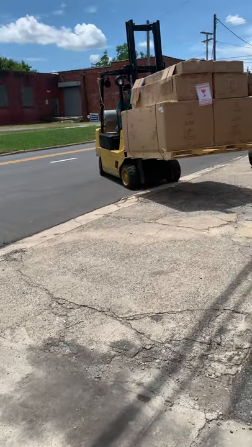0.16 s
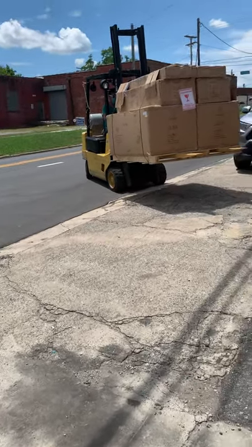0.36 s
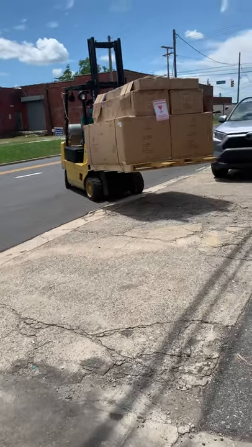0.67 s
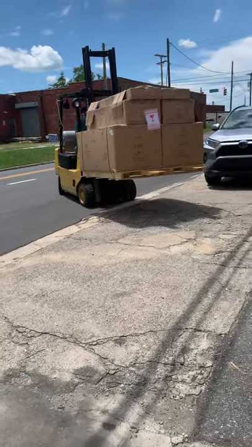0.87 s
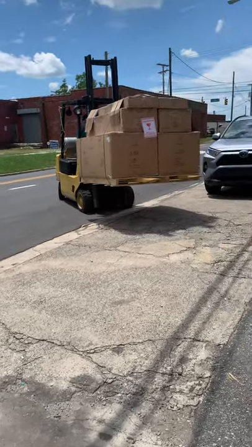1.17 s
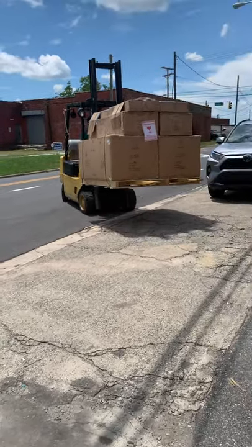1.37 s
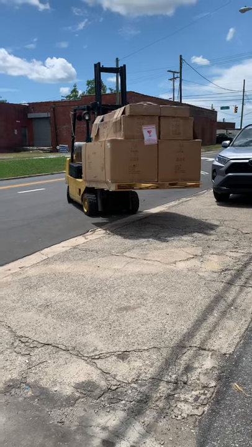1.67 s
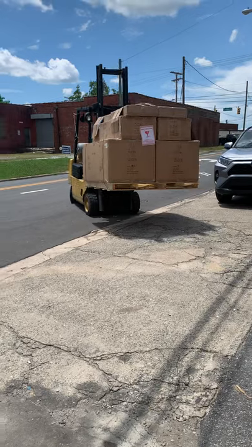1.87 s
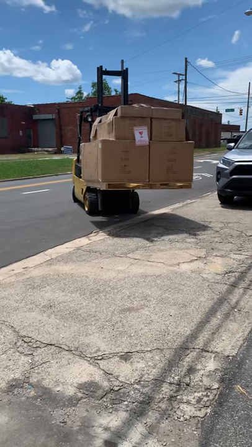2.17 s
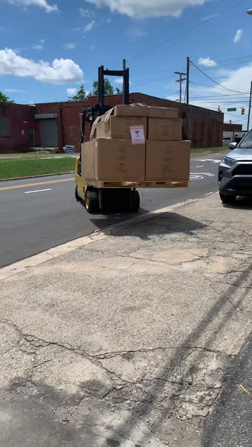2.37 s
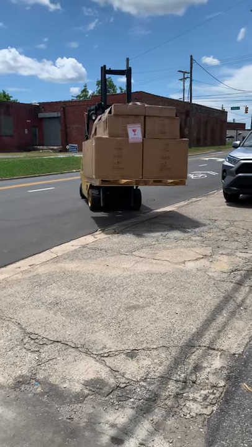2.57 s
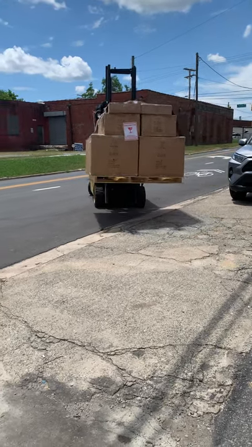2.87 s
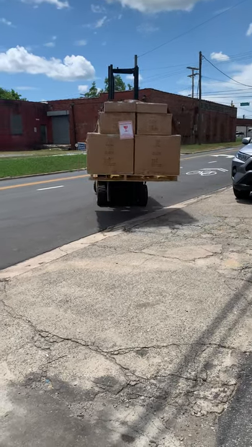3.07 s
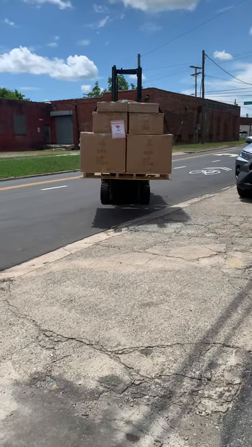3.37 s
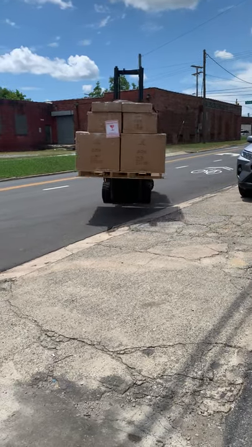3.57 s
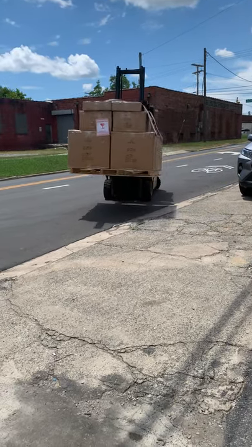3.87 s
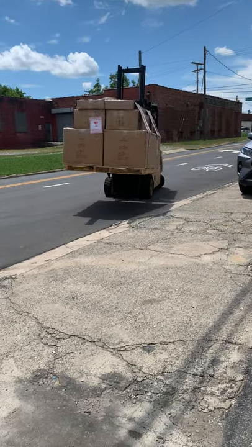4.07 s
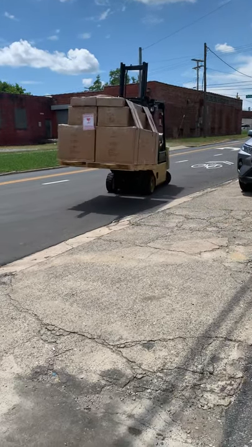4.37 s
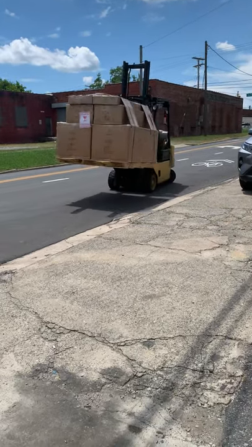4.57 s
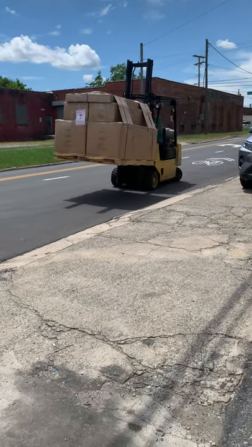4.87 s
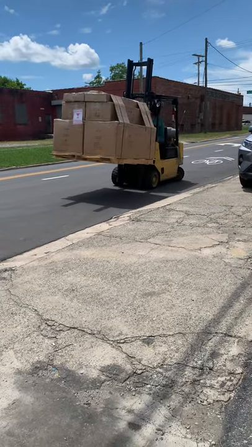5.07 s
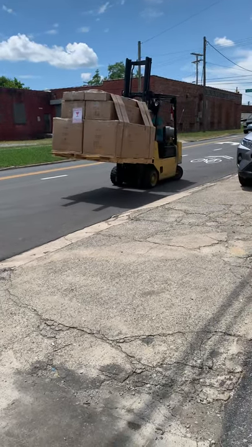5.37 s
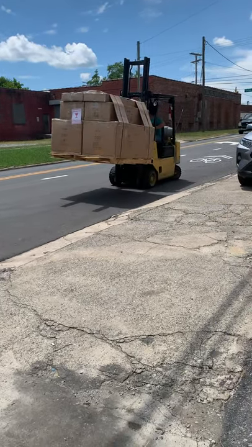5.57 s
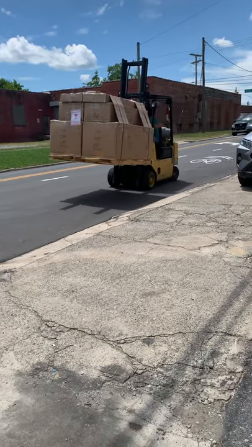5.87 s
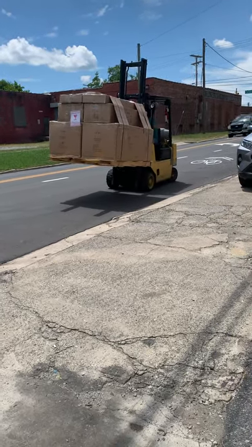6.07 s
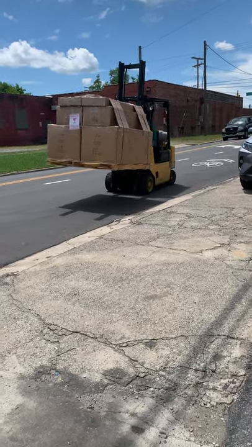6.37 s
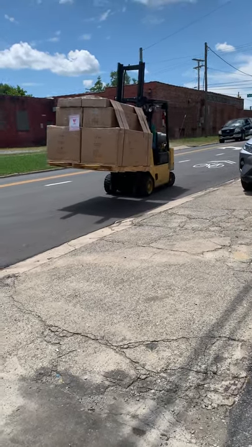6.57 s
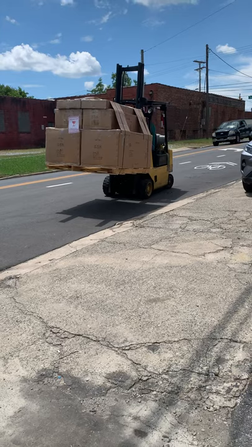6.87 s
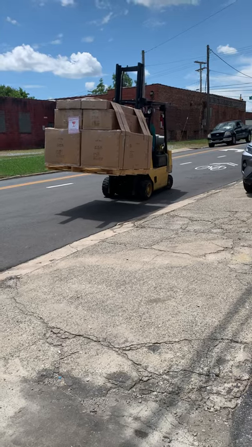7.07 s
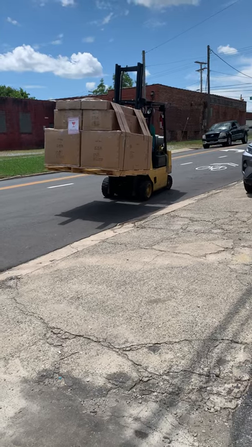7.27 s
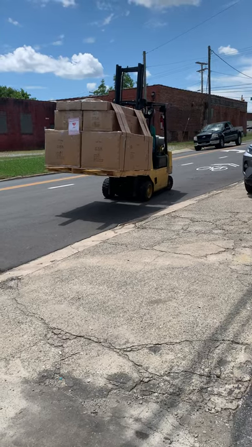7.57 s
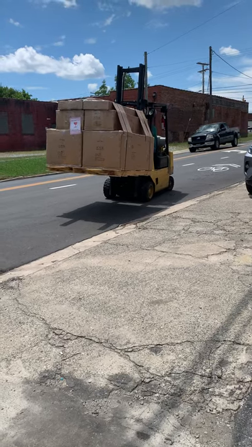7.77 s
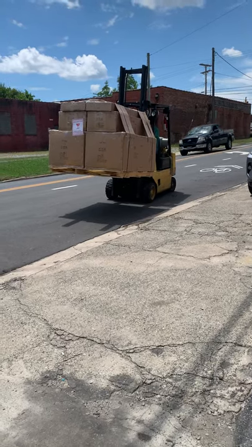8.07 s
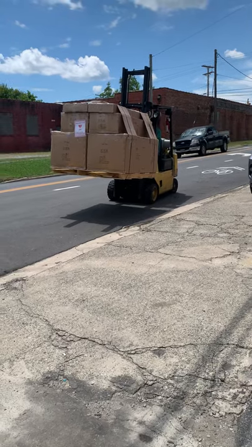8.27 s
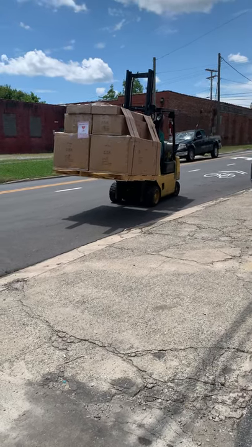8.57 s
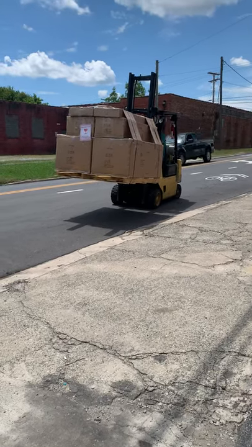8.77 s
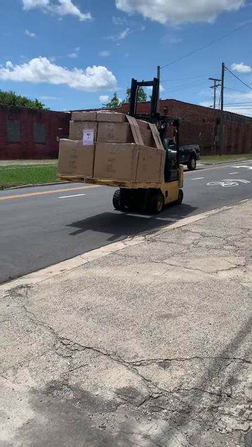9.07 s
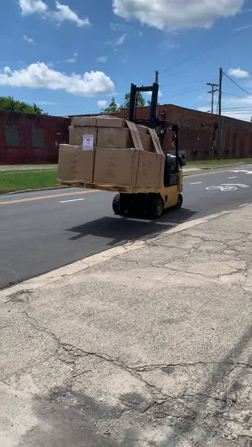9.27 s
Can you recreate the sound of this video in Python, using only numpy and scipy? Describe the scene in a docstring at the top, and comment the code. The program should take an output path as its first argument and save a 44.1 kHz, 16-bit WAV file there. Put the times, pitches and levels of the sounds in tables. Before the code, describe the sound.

Outdoors near a brick-lined road, a steady, limping engine throb rises in two surges as a loaded forklift turns, with whines, valve clatter and a thin squeak. It drops back to idle over gritty tyres. Mast and load then rattle in scattered hollow knocks, and a pickup's tyre roar and drone come and go. Handheld stereo pickup at a few metres, faint town rumble.

```python
"""Forklift with a pallet of boxes on a street

A four-cylinder forklift idles, revs up to turn and settles: harmonics of the firing rate slide through
pipe resonances, while filtered noise, mostly tied to the crankshaft, makes gas rumble, block, valves, hiss.
Decaying modes make the knocks of mast and load and the chinks of the lift chain; noise bands make scrubs,
squeaks and grit; swept tones make whines. Echoes, town rumble and a passing pickup surround it."""
import sys
import numpy as np
from scipy import signal
from scipy.fft import rfft, irfft
from scipy.io import wavfile
from scipy.ndimage import uniform_filter1d

SR = 44100
rng = np.random.default_rng(int(sys.argv[2]) if len(sys.argv) > 2 else 0)


def digitize_waveform(pressure):
    """Quantize a signal to 16-bit integers and store it at the path in sys.argv[1].

    Rows of a 2-D input are taken as channels; values are limited to [-1, 1].
    """
    field = np.atleast_2d(pressure).T
    bounded = np.clip(field, -1, 1)
    quanta = np.round(bounded * 32767).astype(np.int16)
    wavfile.write(sys.argv[1], SR, quanta)


N = 414981
TIME = np.arange(N) / SR
FREQS = np.arange(N // 2 + 1) * SR / N


def undb(db):
    """Logarithmic level: decibels to amplitude gain."""
    return 10 ** (np.asarray(db) / 20)


def level(x, db):
    """Root-mean-square level: normalise x, then apply a level or level curve [dB]."""
    return x * undb(db) / np.sqrt(np.mean(x ** 2))


def curves(table):
    """Linear interpolation: each column of a table of timed rows becomes a curve."""
    s, *columns = np.transpose(table)
    return [np.interp(TIME, s, c) for c in columns]


def response(points):
    """Frequency response: gain at every frequency, joined on a log scale from (frequency [Hz], level [dB])."""
    hz, db = np.transpose(points)
    return undb(np.interp(np.log(FREQS + 1), np.log(hz), db))


def colour(x, points):
    """Linear filtering: multiply the spectrum of x by a response."""
    return irfft(rfft(x) * response(points), N)


def noise():
    """White noise: equal mean power at every frequency."""
    return rng.standard_normal(N)


def walk(hz):
    """Low-passed noise: a smooth random wander up to about hz, with rms spread 1."""
    return level(irfft(rfft(noise()) * np.exp(-(FREQS / hz) ** 2), N), 0)


def decay(t, t60):
    """Exponential damping: 60 dB down after t60 [s]."""
    return np.exp(-np.log(1000) * t / t60)


def swell(s, length):
    """Gaussian envelope: a bell-shaped rise and fall around time s."""
    return np.exp(-2 * ((TIME - s) / length) ** 2)


def add(out, s, x):
    """Superposition: mix x into out from time s."""
    i = int(np.clip(s * SR, 0, N - 1))
    out[i:i + len(x)] += x[:N - i]


# firing rates [1/s] over which the cylinders even out, the pulses take their revved shape,
# and (from full sag to none) the sagging engine recovers
EVEN_HZ, REVVED_HZ, SAG_HZ = (28.64, 33.1), (32, 34.5), (24.2, 26.2)

# resonances of the exhaust pipe and body:
# (centre [Hz], half width [Hz], relative level [dB], extra from the right side [dB])
PIPE_MODES = [(37.8, 2.9, -35, -0.5), (53.1, 4.7, -32.5, -1), (83, 26, -42.5, 4.5), (109.5, 4.6, -40, 13.5),
              (123.2, 9.35, -25.5, -1.5), (163, 15, -32, 1.36), (189, 6.9, -36.5, 5),
              (247.7, 15.9, -41.5, 6.5), (284.6, 12, -55, 15.5), (352, 32, -42, -1.5)]


def pipe(hz, right):
    """Resonance: a harmonic swells as it crosses a mode of the exhaust; mode powers add."""
    power = 0
    for centre, half_hz, db, right_db in PIPE_MODES:
        gain = undb(db + right_db * right) / (1 + ((hz - centre) / half_hz) ** 2)
        power = power + gain ** 2
    return np.sqrt(power)


# relative strength of each cylinder in firing order [dB]
CYLINDER_DB = [1.1, -2.9, 1.4, 0]
# harmonics of the exhaust pulse:
# (multiple of firing rate, relative level [dB], extra when revved [dB], extra when sagging [dB])
ORDERS = [(1, -9, 8.5, -4), (2, -1.5, 5.3, 5), (3, 1.5, .3, 6), (4, .7, -7.5, 0), (5, -1.8, 1.5, -12),
          (6, 4.1, 5.7, -10), (7, -3.5, .3, -3), (8, -3, 7.3, -10), (9, 0, -6, -8), (10, -4, 2, -6)]


def exhaust(firing, rate_hz, octaves, right, smear=0.58, rise_db=5):
    """Harmonic series: pulses of four unequal cylinders, shaped by pipe resonance; rise_db is per octave."""
    revs = np.interp(rate_hz, EVEN_HZ, [0, 1])
    sag, revved = np.interp(rate_hz, SAG_HZ, [1, 0]), np.interp(rate_hz, REVVED_HZ, [0, 1])
    chance = rng.standard_normal(size=(600, 2))
    shot = np.arange(len(chance))
    size_db = np.resize(CYLINDER_DB, len(shot)) + .9 * chance[:, 0]
    # differences between firings shrink by 40 % as the engine speeds up
    size = undb(np.interp(firing, shot, size_db) * (1 - .4 * revs))
    phase = firing + .003 * np.interp(firing, shot, chance[:, 1])
    # an intake pulse between two firings shifts the odd harmonics [rad]
    intake = 1.15
    # the pipe gain is found at every 200th sample and interpolated
    slow = slice(None, None, 200)
    out = 0
    for k, db, revved_db, sag_db in ORDERS:
        resonance = np.interp(TIME, TIME[slow], pipe(k * rate_hz[slow], right[slow]))
        gain = resonance * undb(db + revved_db * revved + sag_db * sag)
        # at speed the pipe still rings when the next pulse comes, which spreads the pulses out
        shift = intake * (k % 2) + smear * revs * (k - 4) ** 2
        out = out - gain * np.sin(2 * np.pi * k * phase - shift)
    return np.sqrt(2) * size * out * undb(rise_db * octaves)


# lope of the unequal cylinders, between the harmonics:
# (multiple of firing rate, level at idle [dB], extra from the right side [dB], extra when revved [dB])
LOPE = [(1.5, -47, 1, 3), (2.5, -51, 1, 5), (3.25, -55, 0, 11), (3.5, -47, 0, 0), (4.5, -49, -2, 2),
        (5.5, -51, 0, 4), (6.25, -45.5, 6, -9), (6.5, -47, -2, -1), (7.5, -55, 3, 4), (8.5, -55, 2, 0),
        (9.5, -55, 11.5, -14)]


def lope(firing, rate_hz, right, waver_db=1.2, lag=.25, smear=.9):
    """Subharmonics: unequal cylinders make the beat limp; the pipe spreads the limp over the cycle."""
    revved = np.interp(rate_hz, REVVED_HZ, [0, 1])
    beats = 0
    for k, db, right_db, revved_db in LOPE:
        gain = undb(db + right_db * right + revved_db * revved)
        beats = beats + gain * np.sin(2 * np.pi * (k * firing - lag) - smear * (k - 4) ** 2)
    return np.sqrt(2) * beats * undb(waver_db * walk(11))


def throb(firing, depth, lag):
    """Amplitude modulation twice per firing: one cylinder exhausts, then the next one draws in."""
    return 1 + depth * np.cos(4 * np.pi * (firing - lag))


def clatter(firing, repeat, grain_db):
    """Cyclostationary noise: a share of the impacts comes back alike with every turn of the camshaft."""
    turn = rng.standard_normal(size=6000)
    cam = firing / len(CYLINDER_DB) % 1
    locked = level(np.interp(cam * len(turn), np.arange(len(turn)), turn), 0)
    share = np.clip(repeat, 0, 1)
    mixed = np.sqrt(share) * locked + np.sqrt(1 - share) * noise()
    return mixed * undb(grain_db * walk(68))


# spectrum of the gas rumble: (frequency [Hz], relative level [dB])
GAS = [(24, -37), (33, -18), (44, -1), (70, -1), (125, 0), (170, 2), (210, -1), (248, 0), (300, -5.5),
       (350, -13), (420, -21), (600, -65), (1200, -70)]


def gas_rumble(firing, rate_hz, octaves, right):
    """Flow noise: turbulent puffs pulse once per firing and grow by 11 dB per octave of speed."""
    repeat = np.interp(rate_hz, EVEN_HZ, [.85, .6])
    puffs = clatter(firing, repeat, grain_db=.6) * (1 + .15 * np.cos(2 * np.pi * firing))
    return level(colour(puffs, GAS), -35.2 + 11 * octaves + 0.3 * right)


# spectrum of the boom: (frequency [Hz], relative level [dB])
BOOM = [(40, -70), (110, -50), (145, -16), (162, 0), (182, 0), (200, -15), (245, -12), (330, -50),
        (1000, -100)]


def sag_boom(rate_hz, full_db=-33.5):
    """Random excitation of a resonance: uneven firings of the sagging engine set the pipe booming."""
    return level(colour(noise(), BOOM), full_db) * np.sqrt(np.interp(rate_hz, SAG_HZ, [1, 0]))


# spectrum of the intake growl: (frequency [Hz], relative level [dB])
GROWL = [(450, -32), (620, 5), (720, 8), (850, 4), (1000, 4), (1200, -25)]
# level of the growl, loudest where the throttle is widest: (time [s], level [dB])
GROWL_LEVEL = [(0, -59), (1.05, -56), (1.35, -45), (1.68, -39.5), (2.1, -45), (2.5, -45), (2.95, -43),
               (3.4, -55), (4.2, -59), (7, -59), (9.41, -55)]


def intake_growl(firing):
    """Modulated flow noise: air drawn through the intake swells twice per firing."""
    gulps = clatter(firing, repeat=0.88, grain_db=2.5) * throb(firing, .35, .1)
    return level(colour(gulps, GROWL), curves(GROWL_LEVEL)[0])


# spectrum of the block: (frequency [Hz], relative level [dB])
BLOCK = [(200, -7.5), (400, 8), (500, -1), (700, 0), (1000, -2.5), (1230, -7.5), (1600, -24), (3000, -60)]


def block_clatter(firing, octaves, right):
    """Structure-borne sound: impacts shake the block, 5.5 dB stronger per octave of speed."""
    thumps = clatter(firing, repeat=0.41, grain_db=2.0) * throb(firing, 0.084, 0.055)
    return level(colour(thumps, BLOCK), -42.5 + 5.5 * octaves + 0.5 * right)


# spectrum of the valve gear: (frequency [Hz], relative level [dB])
VALVES = [(700, -27), (1200, 0), (1480, 11.5), (1800, 6), (2150, 6.5), (2400, 0), (2780, 8), (3150, -5),
          (4000, 1), (4700, -20), (6000, -2), (12000, -41)]


def valve_taps(firing, octaves):
    """Impact noise: valve-gear taps pulse with the firings and grow by 9.5 dB per octave of speed."""
    taps = clatter(firing, repeat=0.5, grain_db=1.52) * (1 + 0.098 * np.cos(2 * np.pi * firing))
    return level(colour(taps, VALVES), -49 + 9.5 * octaves + 1.33 * walk(10.7))


# spectrum of the treble hiss: (frequency [Hz], relative level [dB])
HISS_SPECTRUM = [(1500, -24), (3500, 17.5), (4600, -9), (5400, 22), (6200, 12.5), (7500, 13), (9000, -3),
                 (10800, 8.5), (12300, 2), (14500, -13), (16000, -21)]
# level of the treble hiss: (time [s], level [dB])
HISS = [(0.0, -59), (0.44, -57), (1.2, -53), (1.7, -45), (2.22, -49), (2.96, -47), (4.09, -56.5),
        (4.87, -55), (5.56, -61), (6.68, -58), (7.44, -58.5), (8.39, -49), (9.15, -59), (9.41, -56)]


def treble_hiss(firing):
    """Broadband flow noise: treble hiss of fan air and passing tyres, with a faint pulse at every firing."""
    air = clatter(firing, repeat=0.04, grain_db=2.0) * (1 + 0.033 * np.cos(2 * np.pi * firing))
    return level(colour(air, HISS_SPECTRUM), curves(HISS)[0] + .5 * walk(11.0))


# tones of the fan and pump, geared to the crankshaft:
# (multiple of firing rate, level at idle [dB], rise [dB/octave], extra from the right side [dB],
#  extra as the engine runs down on the left side [dB])
FAN_TONES = [(10.5, -56, 6, 0, 4), (11.5, -57, -6, 0, 0), (15, -64, -12, 13, 0), (17, -57.5, -6, -6, 0),
             (20, -67, -15, 10, 0), (25, -62, -20, 9, 0), (30, -63, 12, 1, 8), (35, -64, 4, -2, 6)]
# the engine cover muffles the higher tones: (frequency [Hz], gain [dB])
COVER = [(1000, 0), (1150, -14)]


def fan_tones(firing, octaves, right, flutter_db=3, wobble=.0025):
    """Order tones: thin tones locked to the crankshaft; some sing out as the engine runs down."""
    phase = firing + wobble * walk(15)
    # fully running down at 0.25 octaves per second
    slowing = np.clip(-np.gradient(octaves) * SR / .25, 0, 1)
    slowing = uniform_filter1d(slowing, size=SR // 5) * (1 - right)
    tones = 0
    for k, db, rise_db, right_db, slowing_db in FAN_TONES:
        tone_db = db + rise_db * octaves + right_db * right + slowing_db * slowing
        tones = tones + undb(tone_db + flutter_db * walk(15)) * np.sin(2 * np.pi * k * phase)
    return colour(np.sqrt(2) * tones, COVER)


# the truck turns from showing its right side to showing its left: (start [s], end [s])
TURN_S = (2.48, 3.66)


def engine(firing, rate_hz, octaves):
    """Superposition of sources: nearly all of the parts follow one crankshaft phase."""
    right = np.interp(TIME, TURN_S, [1, 0])
    note = exhaust(firing, rate_hz, octaves, right) + lope(firing, rate_hz, right)
    flow = gas_rumble(firing, rate_hz, octaves, right) + sag_boom(rate_hz) + intake_growl(firing)
    metal = block_clatter(firing, octaves, right) + valve_taps(firing, octaves)
    treble = treble_hiss(firing) + fan_tones(firing, octaves, right)
    return note + flow + metal + treble


# hard chinks of the lift chain: (time [s], level [dB])
HARD_CHINKS = [(1.022, -30), (1.165, -34), (1.309, -33), (1.338, -31), (1.584, -34), (1.671, -32),
               (1.697, -32), (1.810, -33), (2.363, -30.5), (2.505, -31), (2.619, -29), (2.704, -32),
               (6.159, -35), (6.902, -35), (7.378, -37), (9.143, -38), (9.292, -38)]


def chain(firing, octaves, chink_hz=5400, typical_db=-52, top_db=-43, rise_db=10, scatter_db=6):
    """Impulsive excitation: firings shake the chain, whose links chink near one pitch, a few times hard."""
    out, t = np.zeros(N), TIME[:SR // 8]
    shakes = np.flatnonzero(np.diff(np.floor(firing)))
    scatter = scatter_db * rng.standard_normal(size=600)[:len(shakes)]
    force_db = np.resize(CYLINDER_DB, len(shakes)) + scatter
    # the ceiling holds at idle speed; the level then rises per octave of engine speed
    faint_db = np.minimum(typical_db + force_db, top_db) + rise_db * octaves[shakes]
    chinks = HARD_CHINKS + list(zip(TIME[shakes], faint_db))
    for (s, db), detune in zip(chinks, rng.standard_normal(size=(600, 2, 1))):
        pair = chink_hz * (1 + .014 * detune)
        ring = np.sin(2 * np.pi * pair * t).mean(0)
        add(out, s, undb(db) * ring * decay(t, .07))
    return out


# tyres crunching over grit: (time [s], level [dB])
GRIT = [(0, -65), (3, -51.5), (4, -59), (5.1, -54), (5.35, -70), (7.5, -81), (8.4, -62), (9.1, -85)]


def grit(per_second=2500, spread_db=3):
    """Poisson-like impulses: tiny grains crack at random under the solid tyres."""
    grains = (rng.random(N) < per_second / SR) * noise() * undb(spread_db * walk(25))
    return level(colour(grains, [(3000, -31), (8000, 0.0), (14000, -1.5)]), curves(GRIT)[0])


# spectrum of the distant town: (frequency [Hz], relative level [dB])
TOWN = [(25, -22), (60, 0), (200, -5), (600, -14), (1000, -16), (2500, -28), (8000, -48), (16000, -60)]


def town_rumble(db=-53):
    """Diffuse field: distant rumble, independent in the two channels and slowly wandering in level."""
    return np.array([level(colour(noise(), TOWN), db + walk(0.99)) for _ in range(2)])


# phase by which the left channel leads: (frequency [Hz], phase [rad])
STEREO_PHASE = [(0, 0), (1100, -.3), (1900, .3), (2400, 1.3), (3700, 1.6), (4700, 3.1), (6800, 6.3),
                (9000, 9.4), (11000, 12.6), (13100, 15.7), (15000, 18.8)]
# left minus right: (frequency [Hz], level difference [dB])
STEREO_BALANCE = [(30, -1), (80, -1.5), (170, -2.7), (330, -3.3), (700, -1), (1500, -1), (2200, -2.2),
                  (3200, 0)]


def stereo(x):
    """Interchannel differences by stereo processing: the two channels differ in phase and level."""
    phase = np.interp(FREQS, *np.transpose(STEREO_PHASE))
    tilt, spectrum = np.sqrt(response(STEREO_BALANCE)), rfft(x)
    left = irfft(spectrum * tilt, N)
    right = irfft(spectrum / tilt * np.exp(-1j * phase), N)
    return np.array([left, right])


def housefronts(x, t60=.2, wet_db=-10):
    """Reverberation by convolution: scattered, dull echoes of road and brick fronts, unlike on each side."""
    t = TIME[:SR // 2]
    # the first 6 ms are free of echoes
    tails = rng.standard_normal((2, len(t))) * decay(t, t60) * (t > .006)
    tails /= np.sqrt(np.sum(tails ** 2, axis=1, keepdims=True))
    wet = signal.fftconvolve(x[None], tails, axes=1)[:, :N]
    return undb(wet_db) * colour(wet, [(250, -13), (600, 2), (2500, 2), (12000, -4)])


# swept whines of the engine's fan and the gears, holding or sinking in pitch:
# (middle [s], length [s], frequency at the middle [Hz], fall [Hz/s], relative level [dB])
WHINES = [(1.27, .14, 640, 150, -49), (1.46, .13, 975, 0, -47), (2.02, .2, 590, 80, -50),
          (2.03, .2, 1020, 100, -49), (2.78, .4, 545, 50, -45), (3.15, .2, 900, 300, -49),
          (4.33, .2, 1035, 80, -53), (5.5, .2, 615, 60, -53), (7.22, .95, 604, 110, -48),
          (8.6, .45, 620, 0, -53)]


def whines(waver_hz=7, flutter_db=2.2, octave_db=-11):
    """Frequency modulation: each whine and its octave swell and fade with a wavering pitch."""
    out = np.zeros(N)
    for s, length, hz, fall_hz, db in WHINES:
        pitch_hz = hz - fall_hz * (TIME - s) + waver_hz * walk(32.6)
        phase = 2 * np.pi * np.cumsum(pitch_hz) / SR
        tone = np.sqrt(2) * (np.sin(phase) + undb(octave_db) * np.sin(2 * phase))
        out += swell(s, length) * undb(db + flutter_db * walk(22)) * tone
    return out


# tyre scrubs, thin squeaks and one short bright screech within a knock:
# (middle [s], length [s], centre [Hz], nominal width [Hz], relative level [dB])
SCRUBS = [(1.914, 0.14, 1910, 1800, -43.5), (2.038, 0.31, 3950, 398, -46.5),
          (3.595, 0.042, 7040, 600, -51.5), (4.607, 0.0059, 7100, 1100, -36),
          (4.865, 0.064, 1270, 350, -46), (5.045, 0.018, 3000, 900, -45.5), (5.88, 0.07, 10500, 600, -60.5),
          (6.556, 0.094, 6640, 700, -49.5), (6.558, 0.081, 11050, 600, -52)]


def scrubs(rough_db=3.0):
    """Band-limited noise: brief swells of roughened noise, each in its own band."""
    out = np.zeros(N)
    for s, length, hz, width_hz, db in SCRUBS:
        band = irfft(rfft(noise()) / (1 + ((FREQS - hz) / width_hz * 1.2) ** 2), N)
        out += level(band, db) * swell(s, length)
    return out * undb(rough_db * walk(90))


# knocks of the mast and load: (time [s], lowest ring of the struck part [Hz],
#  relative body level [dB], relative crack level [dB], change per rebound [dB])
KNOCKS = [(4.559, 1100, -41, -45, -10), (4.593, 1500, -56, -52, -8), (4.604, 1540, -45, -41.5, -8),
          (4.611, 1450, -45, -47, -7), (4.629, 1500, -53, -50, -6), (6.277, 867, -37.5, -47, -3.5),
          (6.299, 1220, -47, -58, -6), (6.655, 800, -34, -41.5, -6), (6.977, 820, -36, -43.5, -5),
          (7.040, 840, -37, -45, -4.5), (7.206, 940, -35, -41.5, -3.8), (7.405, 745, -41.5, -43, -5),
          (7.597, 767, -45, -55, -5), (7.76, 2210, -52, -58, -6), (7.819, 2210, -50, -53, -5),
          (8.042, 945, -44, -54, -6), (8.59, 2220, -48.5, -50, -5)]
# ring of a struck part: (multiple of its lowest ring, relative level [dB], t60 [s])
MAST_MODES = [(1, 0, .11), (1.07, -4, .08), (1.27, -8, .11), (1.44, -9, .1), (1.75, -10, .08),
              (2.0, -7, .08), (2.31, -6, .08), (2.9, -12, .06)]
# rattle of a struck part: (multiple of its lowest ring, relative level [dB])
THUD = [(.4, -30), (.72, -8), (.92, 13), (1.4, 6), (2.3, 7), (3.2, -3), (4.8, -7), (8, -30)]
# spectrum of the crack: (frequency [Hz], relative level [dB])
CRACK = [(1000, -11), (3000, 6), (5500, 11.5), (7500, 4), (11000, 3), (13000, .5), (16000, -24)]


def knocks(ring_db=5.5, thud_db=7.3, crack_db=6.5, thud_t60=.04, contacts=5):
    """Modal impact: a bright crack, then the load chatters, each rebound ringing the struck part again."""
    gap_s, scatter_db, rebound_crack_db = (.005, .013), 1.5, -13
    out, crack = np.zeros((2, N))
    t = TIME[:SR // 4]
    freqs = np.arange(len(t) // 2 + 1) * SR / len(t)
    ratios, rattle_db = np.transpose(THUD)
    for s, hz, body_db, bright_db, rebound_db in KNOCKS:
        clack = undb(np.interp(freqs / hz, ratios, rattle_db))
        for n in range(contacts):
            # each contact lands elsewhere and weights the modes differently
            chance = rng.standard_normal((len(MAST_MODES), 2))
            ring = 0
            for (k, db, t60), (a, b) in zip(MAST_MODES, chance):
                mode = np.sin(2 * np.pi * hz * k * (1 + .012 * b) * t)
                ring = ring + undb(db + 3 * a) * mode * decay(t, t60)
            rattle = irfft(rfft(rng.standard_normal(len(t))) * clack, len(t)) * decay(t, thud_t60)
            force_db = n * rebound_db + (n > 0) * scatter_db * rng.standard_normal()
            body = undb(ring_db) * ring + undb(thud_db) * rattle
            add(out, s, undb(body_db + force_db) * body)
            snap_db = bright_db + crack_db + force_db + (n > 0) * rebound_crack_db
            add(crack, s, undb(snap_db) * rng.standard_normal(len(t)) * decay(t, .026))
            s += rng.uniform(*gap_s)
    return out + colour(crack, CRACK)


# exhaust drone of the pickup: (frequency [Hz], relative level [dB])
PICKUP_DRONE = [(60, -20), (100, -14), (116, 0), (126, 0), (140, -20), (172, -5), (200, -22), (250, -6),
                (280, -35), (1000, -100)]


def pickup(tyres_db=-44, drone_db=-37.5, nearest_s=8.45, passing_s=1.05):
    """Pass-by envelope: tyre roar and exhaust drone, both coloured noise, swell and fade together."""
    roar = [(120, -12), (265, 8), (400, -6), (630, 1), (950, -6), (1400, 0), (1850, -13),
            (2200, -11), (4000, -28), (12000, -50)]
    tyres = np.array([level(colour(noise(), roar), tyres_db) for _ in range(2)])
    drone = stereo(level(colour(noise(), PICKUP_DRONE), drone_db))
    return swell(nearest_s, passing_s) * (tyres + drone)


# engine speed before a small random wander: (time [s], firing rate [1/s])
ENGINE_SPEED = [(0.1, 26.6), (1.0, 27.0), (1.24, 28.5), (1.57, 34.3), (1.78, 36.2), (2.12, 33.6),
                (2.59, 35.1), (3.03, 38.6), (3.3, 34.3), (3.85, 29.04), (4.2, 27.1), (5.05, 27.2),
                (5.6, 24.0), (6.09, 26.0), (6.48, 27.0), (7.67, 27.3), (8.29, 26.3), (9.07, 26.6),
                (9.41, 27.2)]


def scene():
    """Superposition: the forklift heard directly, its reflections, the town and the pickup."""
    idle_hz = 27
    rate_hz = curves(ENGINE_SPEED)[0]
    octaves = np.log2(rate_hz / idle_hz)
    # running count of firings, the phase that the engine parts share
    firing = np.cumsum(rate_hz * (1 + .002 * walk(5))) / SR
    truck = engine(firing, rate_hz, octaves) + chain(firing, octaves) + grit()
    truck = truck + whines() + scrubs() + knocks()
    return stereo(truck) + housefronts(truck) + town_rumble() + pickup()


def record(dry):
    """Band limiting: a steep elliptic low-pass cuts the top above 15.8 kHz."""
    top_hz = 15800
    return signal.sosfilt(signal.ellip(10, .2, 70, top_hz, fs=SR, output="sos"), dry)


dry = scene()
out = record(dry)
digitize_waveform(out)
```